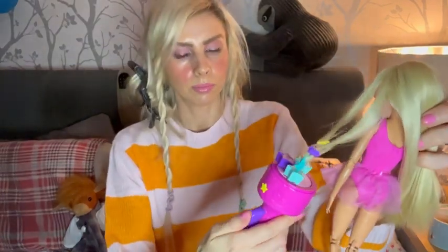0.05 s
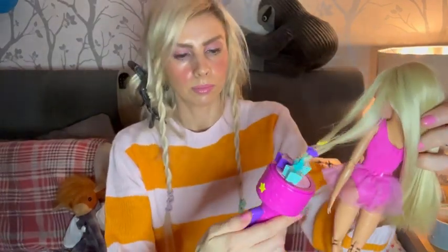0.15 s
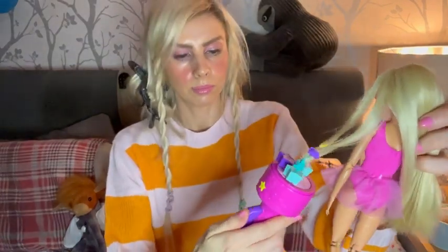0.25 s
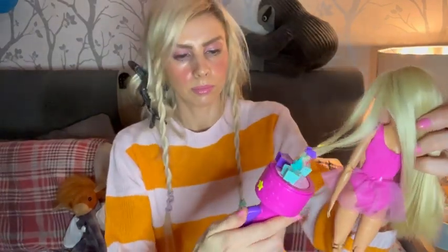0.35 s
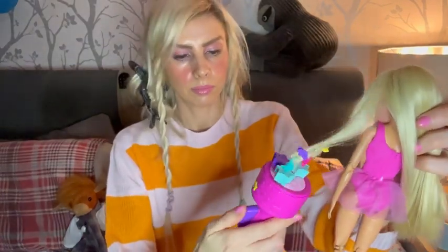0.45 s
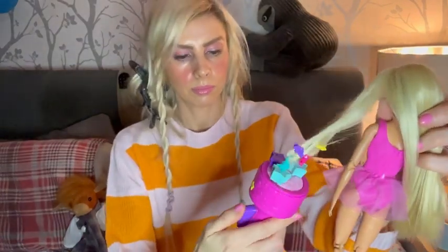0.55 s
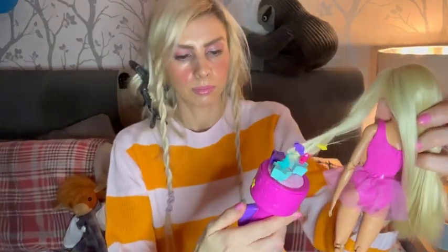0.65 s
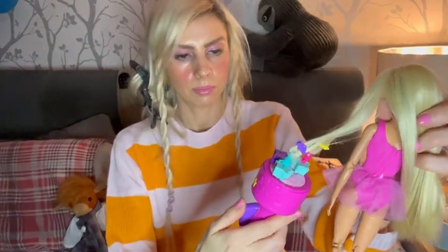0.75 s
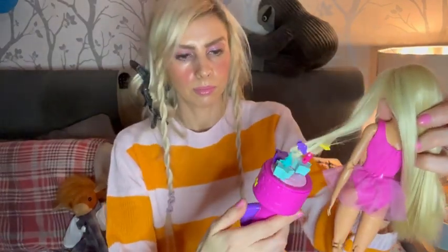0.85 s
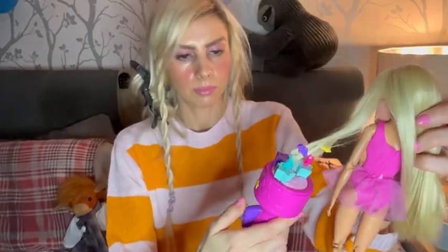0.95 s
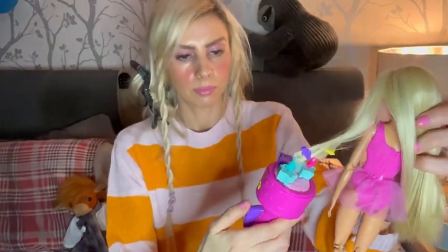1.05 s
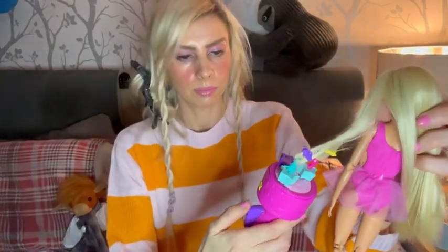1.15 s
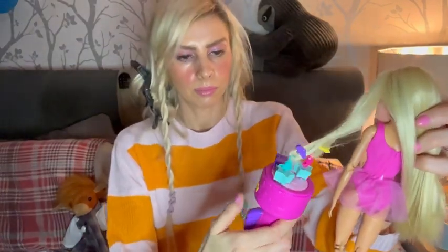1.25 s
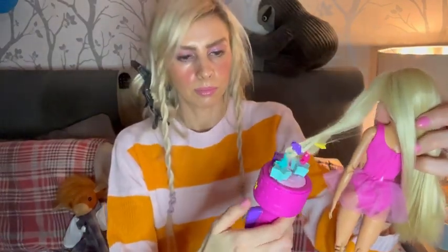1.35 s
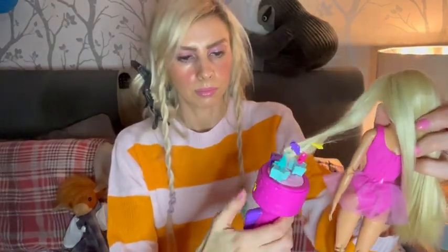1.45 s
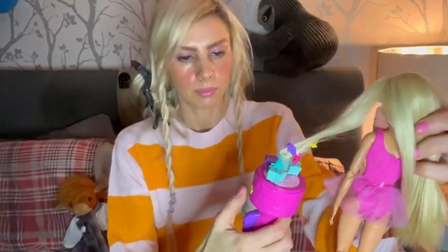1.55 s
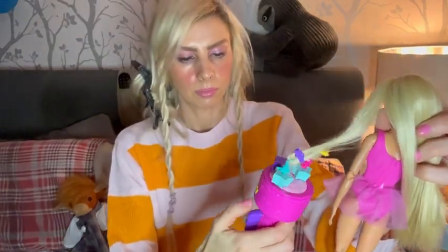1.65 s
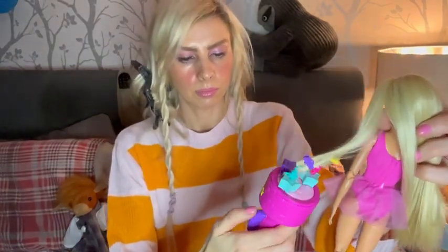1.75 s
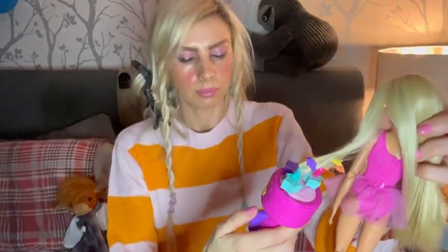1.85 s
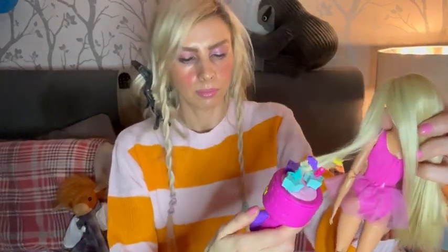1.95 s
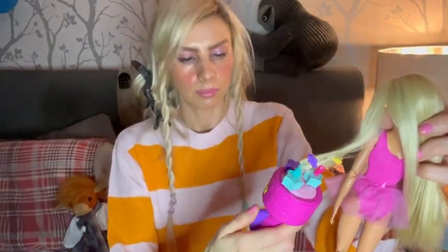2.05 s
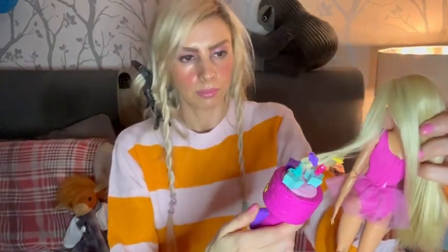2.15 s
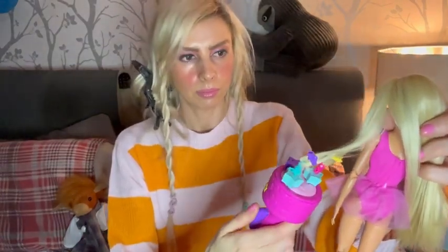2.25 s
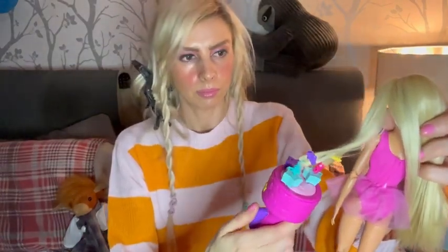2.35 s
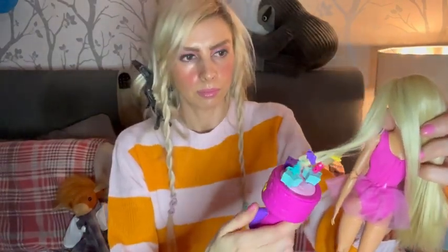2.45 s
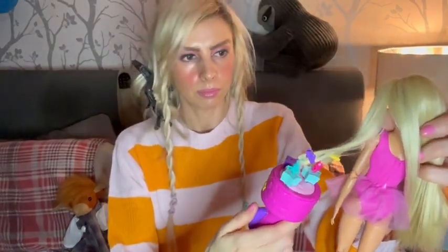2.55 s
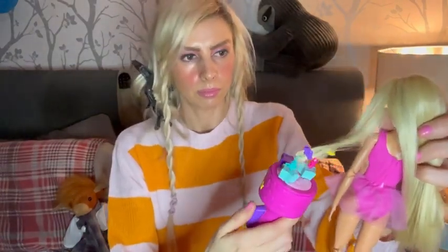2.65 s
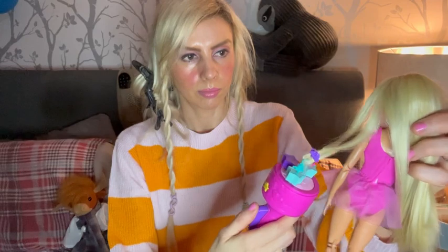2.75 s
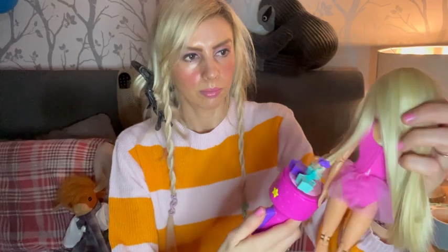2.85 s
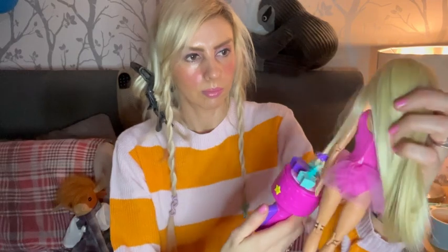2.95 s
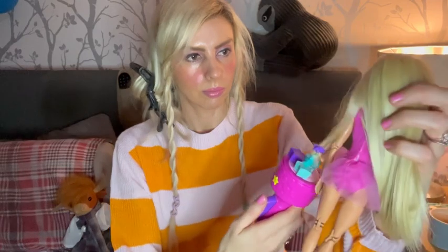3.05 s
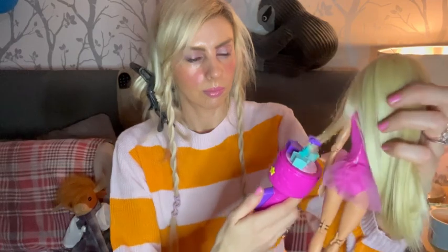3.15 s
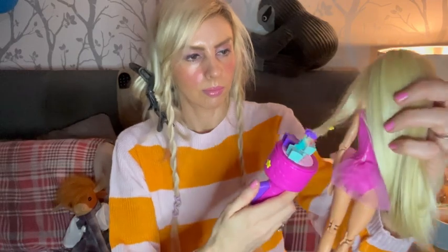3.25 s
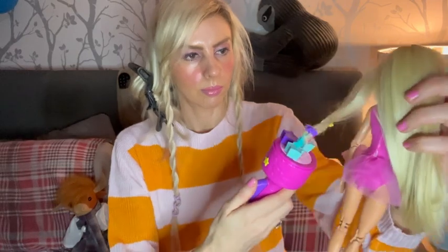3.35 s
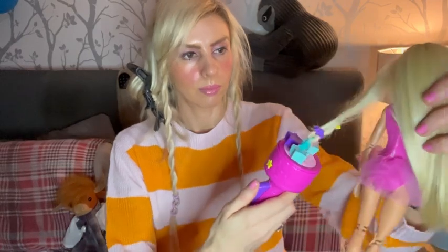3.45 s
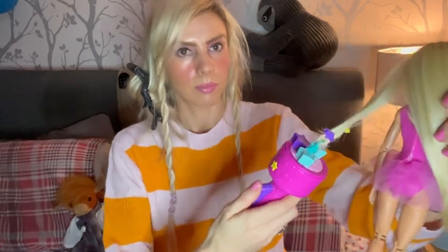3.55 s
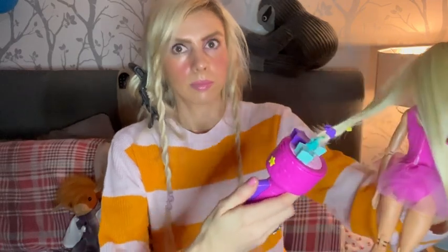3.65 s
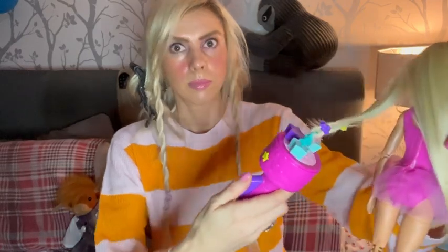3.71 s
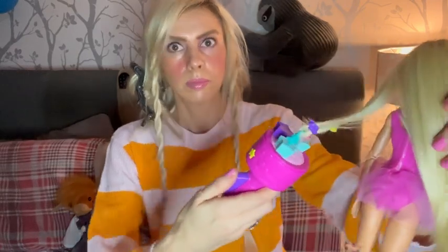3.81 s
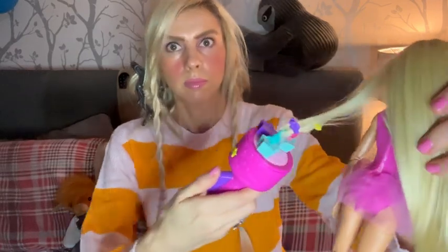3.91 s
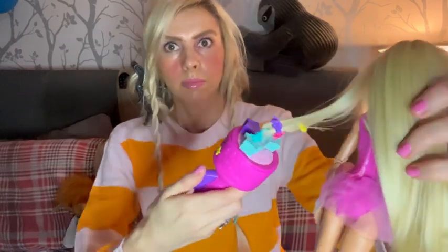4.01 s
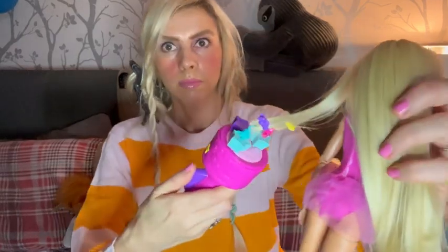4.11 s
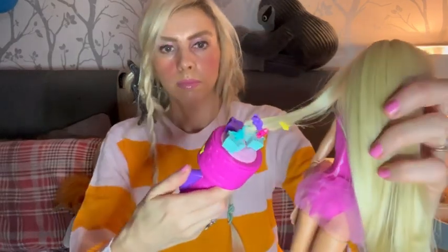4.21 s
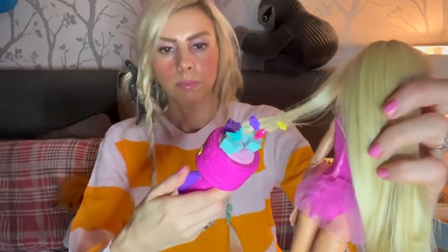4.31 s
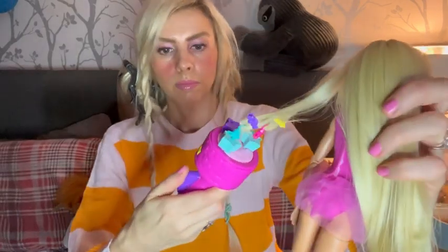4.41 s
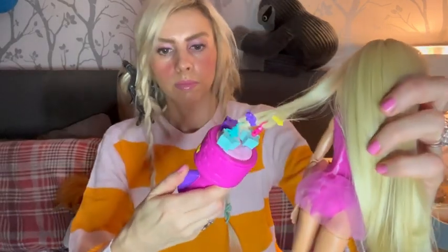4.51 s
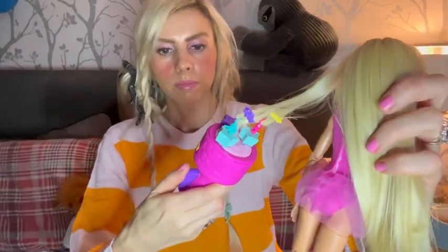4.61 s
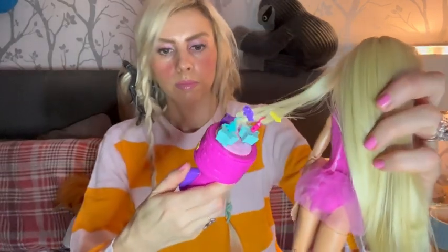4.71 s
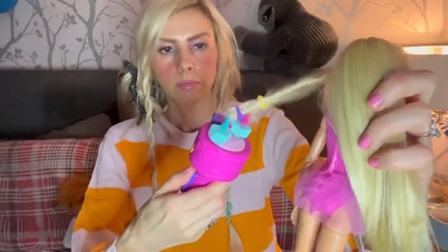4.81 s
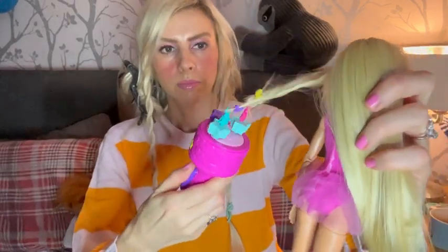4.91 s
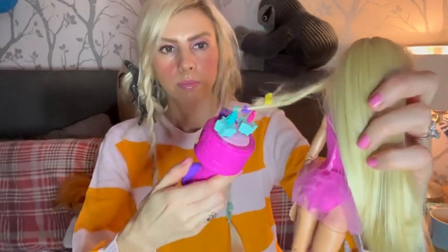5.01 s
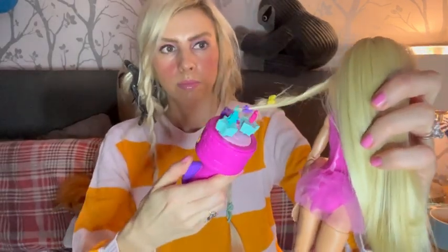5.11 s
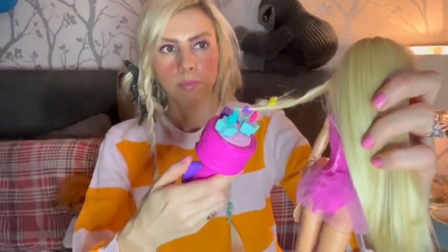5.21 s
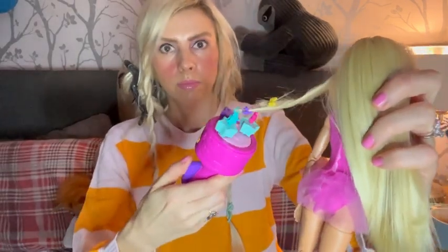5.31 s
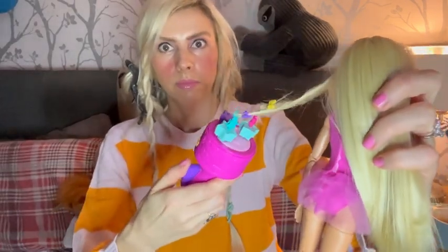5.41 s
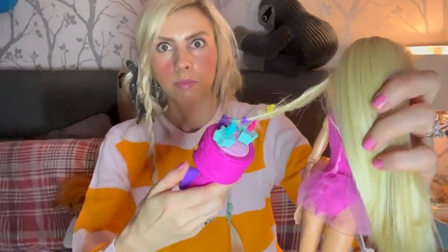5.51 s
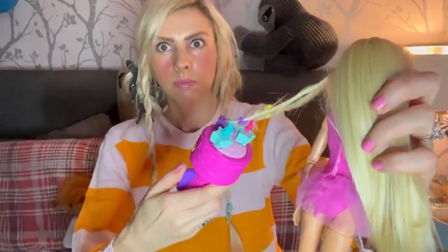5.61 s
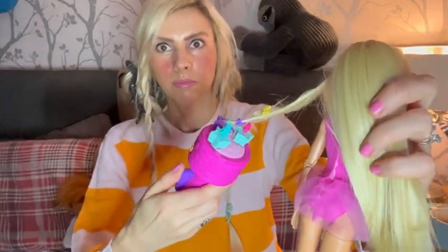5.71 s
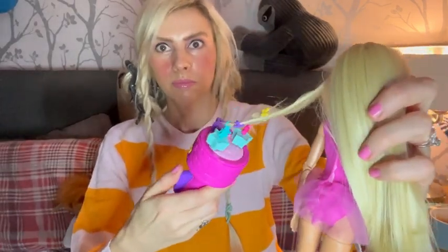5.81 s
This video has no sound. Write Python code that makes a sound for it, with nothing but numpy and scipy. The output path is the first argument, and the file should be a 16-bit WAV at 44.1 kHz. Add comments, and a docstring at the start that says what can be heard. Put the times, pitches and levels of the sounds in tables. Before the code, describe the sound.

A quiet room with distant road rumble and light handling clicks; a toy's motor buzzes for an instant, then its gears crack loudly three times.

```python
"""Vehicle outside, hand gadget in a quiet room

A vehicle passes outside: road noise swells in the low room modes, with engine and gear tones as sines.
Close by, a plastic gadget ticks as it is handled: noise cracks ringing its shell. Its small motor whirs
for a tenth of a second (rattling noise over a mesh tone), then the gears catch softly and snap three
times, loud enough to overload. Steady microphone hiss and a diffuse room tail surround it."""
import sys
import numpy as np
from scipy import signal
from scipy.fft import rfft, irfft, next_fast_len
from scipy.io import wavfile
from scipy.ndimage import uniform_filter1d

SR = 44100
rng = np.random.default_rng(int(sys.argv[2]) if len(sys.argv) > 2 else 0)


def to_wav(s):
    """Save 16-bit WAV."""
    ch = np.atleast_2d(s).T  # columns
    pcm = np.round(np.clip(ch, -1, 1) * 32767)  # PCM
    wavfile.write(sys.argv[1], SR, pcm.astype(np.int16))


N = 258822
FFT_LEN = next_fast_len(N)
FFT_HZ = np.arange(FFT_LEN // 2 + 1) * SR / FFT_LEN
TIME_S = np.arange(N) / SR
OPPOSITE = np.array([[1], [-1]])     # left, right polarity


def from_db(db):
    """Amplitude ratio of a level in dB."""
    return 10 ** (np.asarray(db) / 20)


def rms_one(x):
    """Scale to rms 1."""
    return x / np.sqrt(np.mean(x ** 2) + 1e-20)


def in_time(rows):
    """Interpolate each column linearly over the time in the first."""
    time_s, *columns = np.transpose(rows)
    return [np.interp(TIME_S, time_s, column) for column in columns]


def at_hz(points, hz):
    """Interpolate the second column over log frequency."""
    point_hz, value = np.array(points).T
    return np.interp(np.log(hz + 1), np.log(point_hz), value)


def coloured(spectrum):
    """Steady noise with the given spectrum, rms 1."""
    white = rfft(rng.standard_normal(FFT_LEN))
    return rms_one(irfft(white * from_db(at_hz(spectrum, FFT_HZ)), FFT_LEN)[:N])


def resonate(x, hz, width_hz):
    """Two-pole resonance, gain 1 at its peak."""
    radius = np.exp(-np.pi * width_hz / SR)
    zeros = np.array([1, 0, -1]) * (1 - radius * radius) / 2
    poles = [1, -2 * radius * np.cos(2 * np.pi * hz / SR), radius * radius]
    return signal.lfilter(zeros, poles, x + 1e-18)


def body(x, modes):
    """Parallel resonances, signs alternating."""
    total = 0
    for k, (hz, width_hz, level_db) in enumerate(modes):
        total = total + (-1) ** k * from_db(level_db) * resonate(x, hz, width_hz)
    return total


def two_ports(x, lag_s, shade_db=0):
    """Left port hears the sound lag_s later, coloured by shade_db; right hears it unchanged."""
    delay = np.exp(-2j * np.pi * FFT_HZ * lag_s)
    left = irfft(rfft(x, FFT_LEN) * from_db(shade_db) * delay, FFT_LEN)[:N]
    return np.array([left, x])


def tone(hz, level_db):
    """Sine of given rms level on a moving pitch, random start phase."""
    phase = 2 * np.pi * np.cumsum(hz) / SR + rng.uniform(0, 2 * np.pi)
    return np.sqrt(2) * from_db(level_db) * np.sin(phase)


# hiss common to both sides: (frequency [Hz], density [dB per Hz])
HISS_COMMON = [(350, -34.5), (600, -2), (880, -8), (1260, -13), (2990, -17.5), (5750, -21.5), (7800, -23),
               (8890, -17), (12700, -25), (13400, -52.5)]
# hiss opposite on the two sides: (frequency [Hz], density [dB per Hz])
HISS_OPPOSITE = [(180, -36.5), (300, -14.5), (378, -5.5), (493, -29), (621, -8), (864, -21), (1050, -27),
                 (8600, -37.5), (9340, -79), (12000, -47.5), (15600, -52.5)]
HISS_COMMON_DB, HISS_OPPOSITE_DB = -69, -63.5


def microphone_hiss():
    """Steady coloured noise, one part common and one opposite on the two sides."""
    common = from_db(HISS_COMMON_DB) * coloured(HISS_COMMON)
    opposite = from_db(HISS_OPPOSITE_DB) * coloured(HISS_OPPOSITE)
    return common + opposite * OPPOSITE


# room resonances: (frequency [Hz], width [Hz], level [dB])
ROOM_MODES = [(144, 45, -9.5), (187.8, 14, 4.5), (232.3, 3.9, -7.5), (299.9, 16, 2), (333, 26, -11),
              (427.3, 16, -5.5), (532, 21, -17.5)]
# road noise between the modes: (frequency [Hz], density [dB per Hz])
BETWEEN_MODES = [(71, -45), (120, -17), (194, -2), (260, -9), (391, -7), (492, -13), (1340, -52),
                 (2500, -47.5), (3250, -75), (5500, -120)]
# deep rumble: (frequency [Hz], density [dB per Hz])
DEEP_RUMBLE = [(20, -20), (35, 3), (48, 5), (90, 6), (130, 0), (200, -51)]
# road noise, before the gains of each roar:
# (time [s], low modes level [dB], drone mode level [dB], upper modes level [dB])
ROAD_LEVELS = [(0.0, -55, -72, -71), (0.3, -57, -62, -75.5), (0.6, -60.5, -70, -71), (0.7, -43, -58, -69),
               (0.88, -56, -61, -68.5), (1.05, -49, -55, -65), (1.15, -42.5, -54.5, -59.5),
               (1.26, -45.5, -47.5, -70.5), (1.38, -54, -59.5, -63.5), (1.62, -46.5, -51, -64.5),
               (2.1, -48.5, -53.5, -59.5), (2.45, -44, -57.5, -62), (2.72, -52, -57, -61),
               (3.15, -44.5, -53, -61), (3.5, -46, -59.5, -64), (3.65, -46.5, -55, -62.5),
               (4.1, -50.5, -57, -65), (4.55, -51, -54, -67.5), (4.9, -50, -54, -58),
               (5.21, -51.5, -58, -63.5), (5.6, -47, -58, -68.5)]
DEEP_NEAREST_DB = -51.5     # before the gain of each roar
NEAREST_S, PASS_WIDTH_S, APPROACH_DB = 2.6, 2.3, 10.5


def road_roar(mode_gain_db, between_gain_db, deep_gain_db):
    """Road noise rings the room modes; the deep rumble swells as the vehicle comes near."""
    low_db, drone_db, upper_db = in_time(ROAD_LEVELS)
    nearness = np.exp(-((TIME_S - NEAREST_S) / PASS_WIDTH_S) ** 2)
    deep_db = DEEP_NEAREST_DB - APPROACH_DB * (1 - nearness)
    road = rng.standard_normal(N)
    ringing = from_db(low_db) * rms_one(body(road, ROOM_MODES[:3]))
    ringing = ringing + from_db(drone_db) * rms_one(body(road, ROOM_MODES[3:4]))
    ringing = ringing + from_db(upper_db) * rms_one(body(road, ROOM_MODES[4:]))
    between = from_db(upper_db + between_gain_db) * coloured(BETWEEN_MODES)
    deep = from_db(deep_db + deep_gain_db) * coloured(DEEP_RUMBLE)
    return from_db(mode_gain_db) * ringing + between + deep


# engine pulls up, then drops on a gear change:
# (time [s], firing rate [Hz], second multiple level [dB])
ENGINE = [(1.7, 41.2, -52), (2.25, 42.6, -57.5), (2.45, 42.5, -42), (2.75, 44.54, -53), (3.0, 44.9, -43.5),
          (3.32, 46.2, -48), (3.5, 47.8, -71), (3.82, 47.4, -49), (3.95, 44.8, -62.5), (4.2, 44.4, -73)]
FIRING_DB = -57.5


def engine():
    """Sines at the firing rate and twice that, faded in and out."""
    firing_hz, second_db = in_time(ENGINE)
    gate = np.interp(TIME_S, [1.5, 1.8, 4.1, 4.4], [0, 1, 1, 0])
    return gate * (tone(firing_hz, FIRING_DB) + tone(2 * firing_hz, second_db))


CRUISE_HZ, BELOW_CRUISE_HZ, BELOW_AT_S, CLIMB_TIME_CONSTANT_S = 385.8, 50.8, 1.5, 1
WHINE_DB, WHINE_IN_S, WHINE_OUT_S = -54, 2.72, 4.2
WHINE_RISE_DB_PER_S, WHINE_FALL_DB_PER_S = 12, 4.5


def transmission_whine():
    """Sine climbing exponentially towards cruising pitch, pitch held for the first second."""
    approach = np.exp((BELOW_AT_S - np.maximum(TIME_S, 1)) / CLIMB_TIME_CONSTANT_S)
    rise_db = WHINE_RISE_DB_PER_S * np.maximum(WHINE_IN_S - TIME_S, 0)
    fall_db = WHINE_FALL_DB_PER_S * np.maximum(TIME_S - WHINE_OUT_S, 0)
    return tone(CRUISE_HZ - BELOW_CRUISE_HZ * approach, WHINE_DB - rise_db - fall_db)


TRAFFIC_LAG_S = 0.00026
FADE_START_S, FADE_DB_PER_S = 5.73, 180


def traffic():
    """Road, engine and whine reach both ports; a second roar is opposite on the two sides."""
    common = road_roar(mode_gain_db=2.5, between_gain_db=5.0, deep_gain_db=1.5)
    opposite = road_roar(mode_gain_db=-6, between_gain_db=4.5, deep_gain_db=-7.5)
    lines = engine() + transmission_whine()
    fade = from_db(-FADE_DB_PER_S * np.maximum(TIME_S - FADE_START_S, 0))
    return fade * (two_ports(common + lines, TRAFFIC_LAG_S) + opposite * OPPOSITE)


def crack(grains, decay_s):
    """Noise bursts with quick rise and fall, evened out to a flat colour."""
    t = np.arange(grains.shape[-1]) / SR
    shape = (1 - np.exp(-t / 0.0006)) * np.exp(-t / max(decay_s, 1e-4))
    for _ in range(6):
        spectrum = rfft(grains * shape)
        flat = irfft(spectrum / np.abs(spectrum))
        grains = np.clip(flat / (shape + 1e-9), -.2, .2)
        grains = grains / np.sqrt(uniform_filter1d(grains ** 2, size=32) + 1e-12)
    return grains * shape


# plastic body: (frequency [Hz], width [Hz], level [dB])
SHELL = [(634, 220, -8), (1160, 430, -5), (1550, 1000, -8.5), (2174, 230, -2), (2988, 1000, -4.5),
         (4100, 590, 0), (5700, 2100, -3), (6610, 300, 2.5), (8470, 1500, -4), (12025, 4500, -5),
         (14400, 3600, -2.5)]
BLOW_LEN = 1024     # samples
ECHO_S, ECHO_DB = .011, -17     # one near wall


def blows(rows, breadth, decay_s):
    """Each crack rings the shell's middle and top modes, plus a snap and a knock of its own pitch."""
    out = np.zeros(N)
    noise = crack(rng.standard_normal((len(rows), 4, BLOW_LEN)), decay_s)
    for row, cracks in zip(rows, noise):
        time_s, middle_db, snap_db, snap_hz, treble_db, knock_db, knock_hz = row
        middle = resonate(body(cracks[0], SHELL[2:5]), 2550, 3900)
        treble = resonate(body(cracks[1], SHELL[7:]), 8900, 6300)
        snap = resonate(cracks[2], snap_hz, breadth * snap_hz)
        snap = resonate(snap, snap_hz, 2 * breadth * snap_hz)
        knock = resonate(cracks[3], knock_hz, 1.15 * breadth * knock_hz)
        knock = resonate(knock, knock_hz, 2 * breadth * knock_hz)
        i = round(time_s * SR)
        rings = (middle_db, middle), (treble_db, treble), (snap_db, snap), (knock_db, knock)
        for peak_db, ring in rings:
            out[i:i + BLOW_LEN] += from_db(peak_db) * ring / np.abs(ring).max()
    return out + from_db(ECHO_DB) * np.roll(out, round(ECHO_S * SR))


# handling: (time [s], middle level [dB], snap level [dB], snap frequency [Hz],
# treble level [dB], knock level [dB], knock frequency [Hz])
TICKS = [(.0596, -57, -50.5, 4700, -49.5, -72, 656), (.3346, -67, -49, 5530, -54, -70, 700),
         (.3647, -44, -36, 6060, -41, -42, 1280), (.3714, -44, -48, 6200, -39, -43, 684),
         (.6234, -74, -57, 5900, -66, -45, 626), (.857, -58, -53.5, 3460, -53, -69, 700),
         (1.5055, -53, -46, 4630, -51.5, -59, 653), (1.7796, -38.5, -42.5, 4230, -67, -39, 724),
         (1.7854, -45, -48, 3250, -70, -40.5, 606), (1.8574, -75, -69, 3400, -72, -45.5, 586),
         (1.902, -53, -51, 5500, -62, -58, 590), (1.9314, -39.5, -31, 4100, -59, -46, 1000),
         (1.95, -47, -57, 2800, -61, -48, 686), (2.0062, -39.5, -33.5, 6160, -63, -39, 636),
         (2.073, -54, -46, 3820, -67, -46, 1070), (2.1304, -71, -51, 6500, -68, -60, 970),
         (2.8727, -43, -40.5, 4900, -59, -51, 790), (2.8875, -44, -45, 4354, -48, -43.5, 1215),
         (2.9628, -49, -29, 4580, -48, -47, 627), (3.0797, -72, -68, 4280, -68, -43.5, 680),
         (3.549, -58, -65, 3414, -57, -49.5, 715), (3.6932, -71.5, -68, 4476, -74, -42.5, 678)]


def handling_ticks():
    """Light blows on the shell, snap and knock narrowly tuned."""
    return blows(TICKS, breadth=0.27, decay_s=0.0021)


# reverberation: (frequency [Hz], 60 dB decay time [s])
ROOM_T60 = [(300, 0.34), (1000, 0.19), (4000, 0.27), (9000, 0.2), (12000, .21), (15000, 0.066)]


def room(x):
    """Diffuse tail from three unrelated noise draws, each band dying at its own rate."""
    t = np.arange(SR // 2) / SR
    edges_hz = 200 * 2 ** np.arange(0, 6.6, .5)
    tail = 0
    for low_hz, high_hz in zip(edges_hz, edges_hz[1:]):
        bandpass = signal.butter(2, [low_hz, high_hz], "band", fs=SR, output="sos")
        band = signal.sosfilt(bandpass, rng.standard_normal((3, len(t))))
        tail = tail + band * from_db(-60 * t / at_hz(ROOM_T60, np.sqrt(low_hz * high_hz)))
    tail = tail * np.clip((t - .002) / 0.0018, 0, 1)
    tail = tail / np.sqrt(np.sum(tail ** 2) / len(tail))     # mean energy 1 per draw
    return signal.fftconvolve(x[None], tail, axes=1)[:, :N]


TOUCH_S, BITE_S, STOP_S = 4.747, 4.756, 4.836     # teeth touch lightly, bite, let go
TOUCH_DB, RUN_DB, BITE_RISE_S, STOP_DB_PER_S = -17.5, -4, .005, 2196.5
MESH_START_HZ, MESH_END_HZ, SPEED_UP_S = 624, 740.7, 4.79     # tooth rate, rising from SPEED_UP_S


def motor():
    """Loose gear teeth rattle densely in the shell, over the rough whine of the mesh."""
    level_db = np.interp(TIME_S, [BITE_S, BITE_S + BITE_RISE_S], [TOUCH_DB, RUN_DB])
    level_db = level_db - STOP_DB_PER_S * np.maximum(TIME_S - STOP_S, 0)
    mesh_hz = np.interp(TIME_S, [SPEED_UP_S, STOP_S], [MESH_START_HZ, MESH_END_HZ])
    teeth = np.cumsum(mesh_hz) / SR
    bunching = 1 + 0.23 * np.cos(2 * np.pi * teeth / 3)     # every three teeth
    lumps_db = 2.0 * rms_one(resonate(rng.standard_normal(N), 120, 250))
    grain_db = 1.2 * rng.standard_normal(N)
    rattle = rng.standard_normal(N) * from_db(grain_db + lumps_db) * bunching
    waver = 1 + .5 * rms_one(resonate(rng.standard_normal(N), 40, 80))
    mesh = waver * np.sin(2 * np.pi * teeth)
    onset = np.clip((TIME_S - TOUCH_S) / 0.0027, 0, 1)
    return onset * from_db(level_db) * (rms_one(body(rattle, SHELL)) + from_db(-12.0) * mesh)


# gears, the first a soft catch: (time [s], middle level [dB], snap level [dB], snap frequency [Hz],
# treble level [dB], knock level [dB], knock frequency [Hz])
SNAPS = [(4.9247, -36, -35.5, 4500, -25.5, -17, 836), (4.9845, -4, 2.5, 5600, -10, -12, 1021),
         (5.0152, -8, 2.5, 6500, -9.5, -8, 1100), (5.063, -6, 1.5, 5800, -3, -10, 960)]


def gear_snaps():
    """Hard blows on the shell, snap and knock broadly tuned."""
    return blows(SNAPS, breadth=0.48, decay_s=0.0019)


# left port against right for the gadget: (frequency [Hz], level [dB])
SHADE = [(300, 1), (650, -3), (1200, -5), (2500, -1.5), (4500, -8.5), (9000, -3), (14000, 1)]
TICK_LAG_S, GEAR_LAG_S = .000095, 0.0001


def scene():
    """Gadget direct and through the room, traffic, hiss."""
    ticks = handling_ticks()
    highpass = signal.butter(4, 250, "high", fs=SR, output="sos")
    gears = signal.sosfilt(highpass, motor() + gear_snaps())
    shade_db = at_hz(SHADE, FFT_HZ)
    near = two_ports(ticks, TICK_LAG_S, shade_db) + two_ports(gears, GEAR_LAG_S, shade_db)
    along, *around = room(from_db(-10) * ticks + from_db(-10.5) * gears)
    far = from_db(-2.5) * two_ports(along, GEAR_LAG_S, shade_db)     # tail from the gadget's side
    far = far + from_db([[-4], [-2.5]]) * around
    return near + far + traffic() + microphone_hiss()


def record(dry):
    """Low-pass, stopband from 16 kHz; the loudest peaks are flattened at full scale."""
    lowpass = signal.cheby2(12, 70, 16000, fs=SR, output="sos")
    return np.clip(signal.sosfilt(lowpass, dry), -1, 1)


dry = scene()
out = record(dry)
to_wav(out)
```